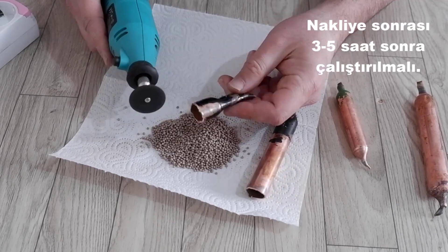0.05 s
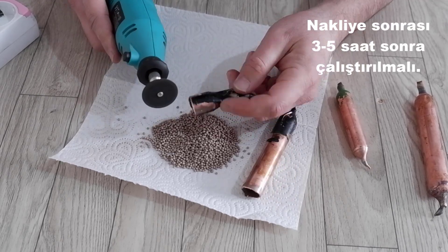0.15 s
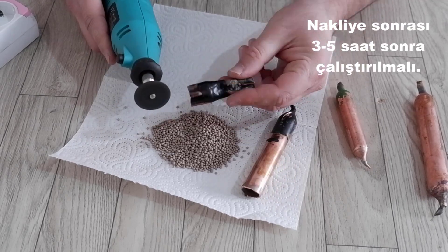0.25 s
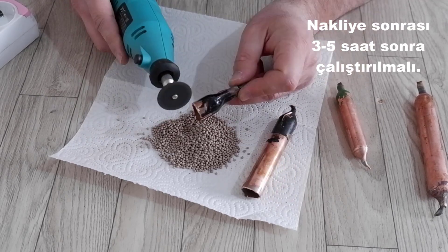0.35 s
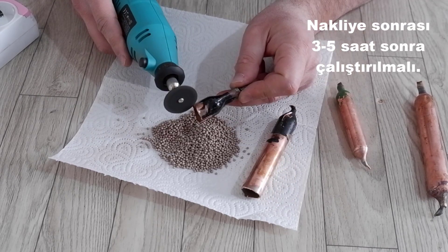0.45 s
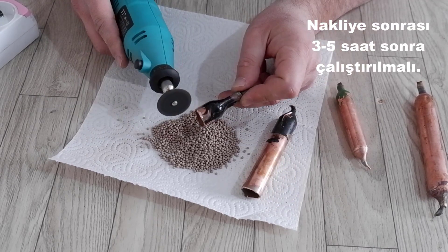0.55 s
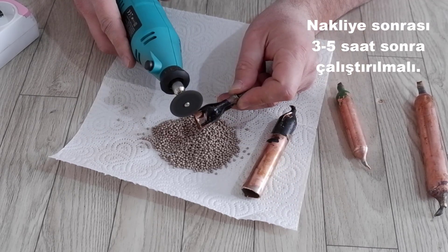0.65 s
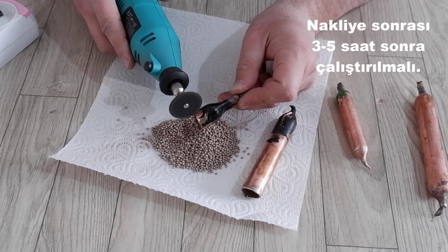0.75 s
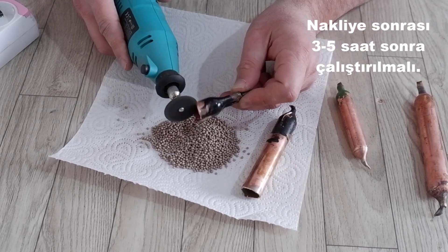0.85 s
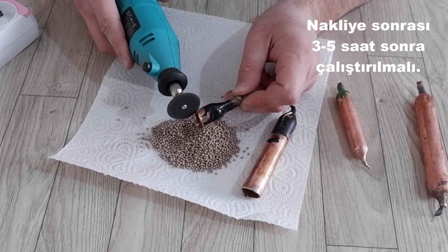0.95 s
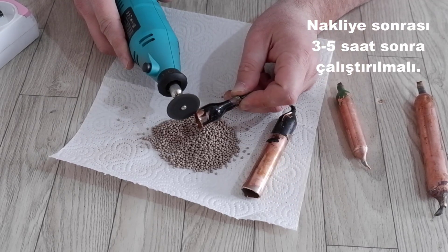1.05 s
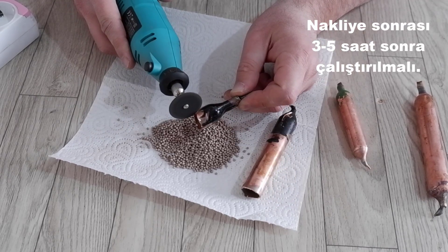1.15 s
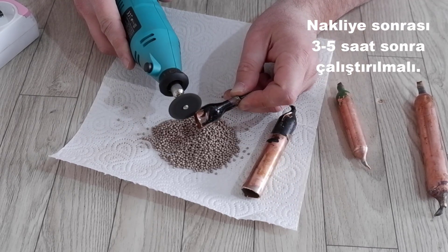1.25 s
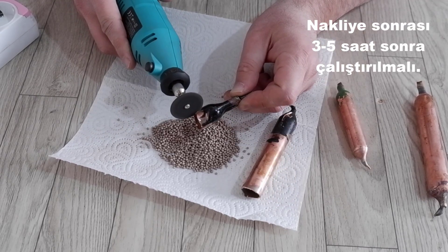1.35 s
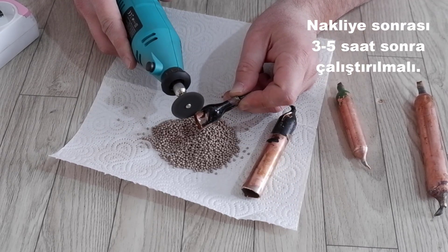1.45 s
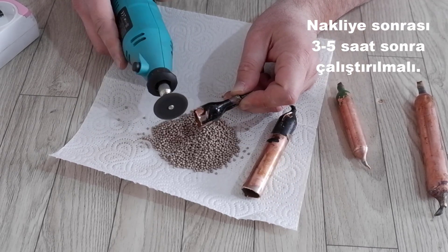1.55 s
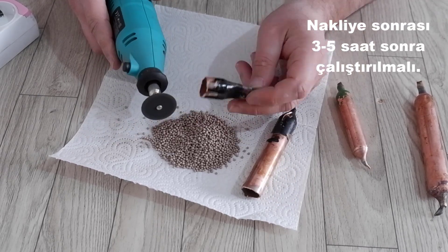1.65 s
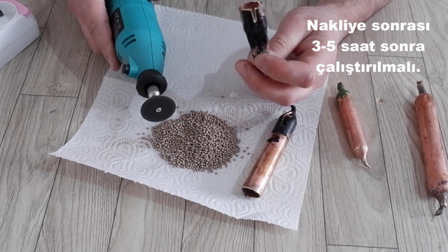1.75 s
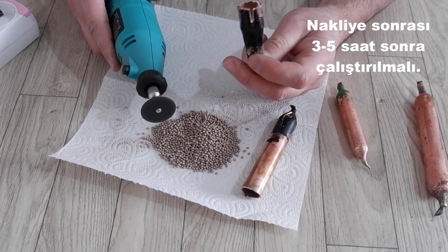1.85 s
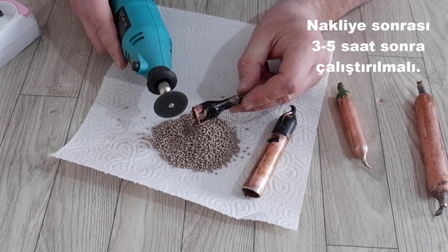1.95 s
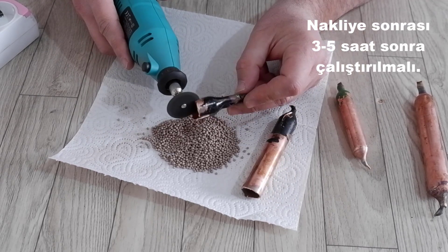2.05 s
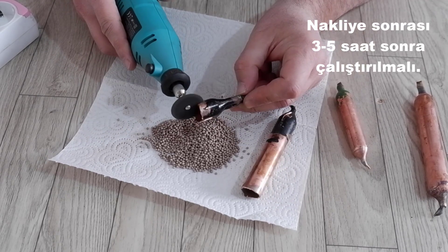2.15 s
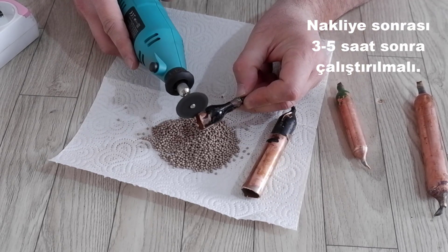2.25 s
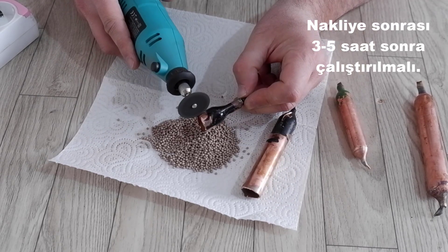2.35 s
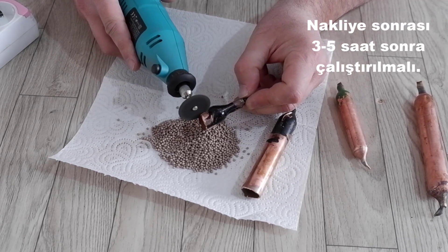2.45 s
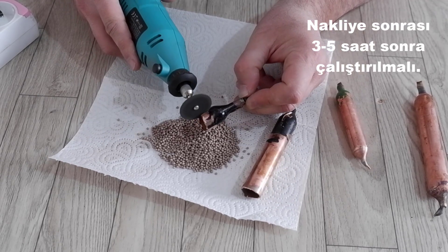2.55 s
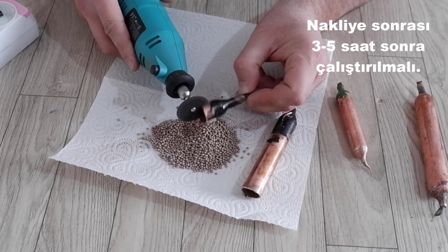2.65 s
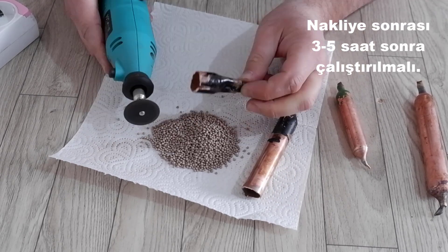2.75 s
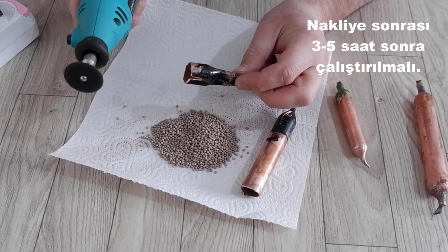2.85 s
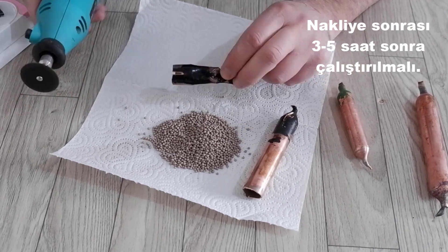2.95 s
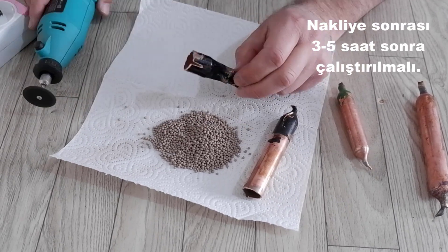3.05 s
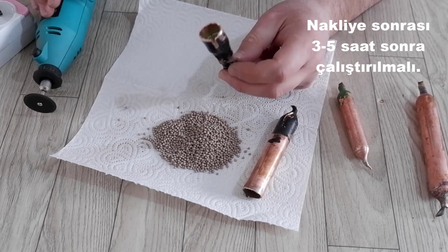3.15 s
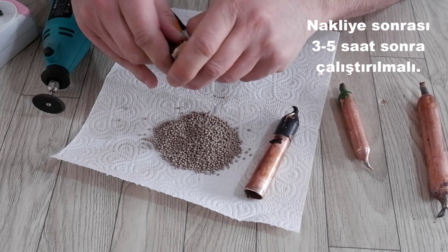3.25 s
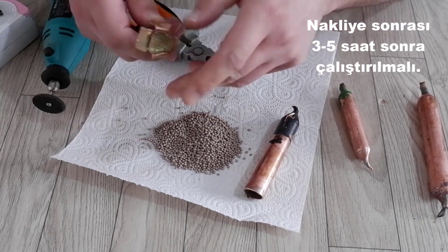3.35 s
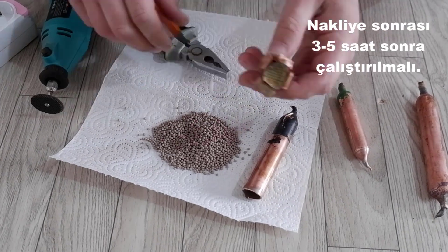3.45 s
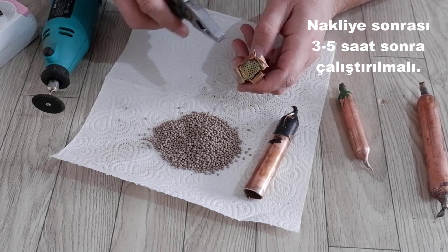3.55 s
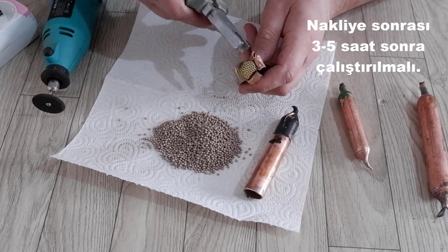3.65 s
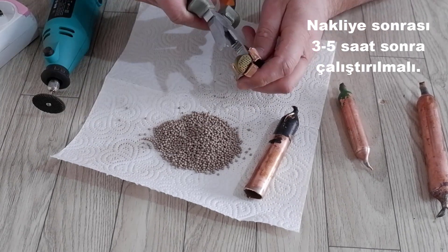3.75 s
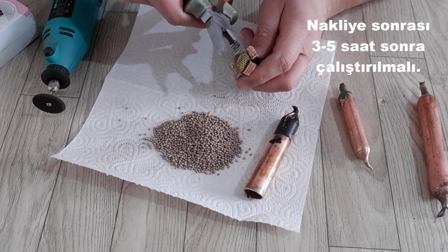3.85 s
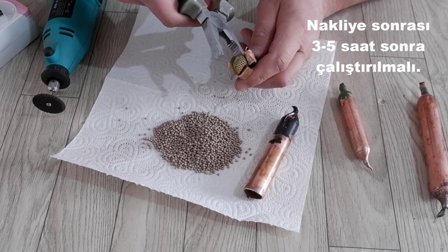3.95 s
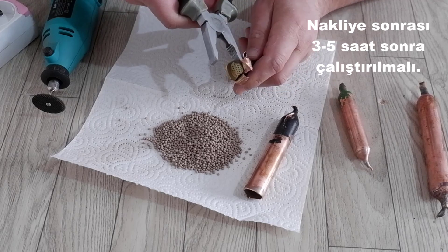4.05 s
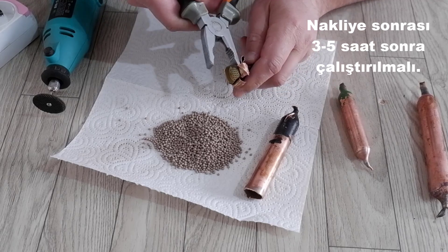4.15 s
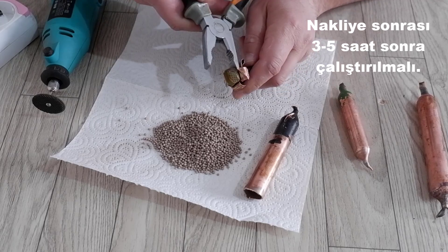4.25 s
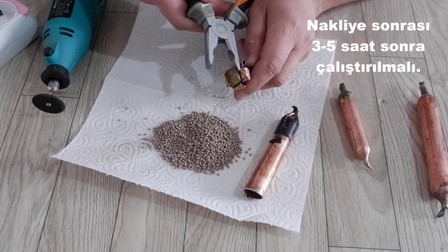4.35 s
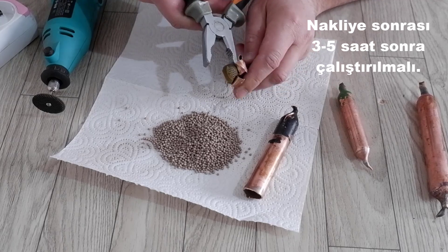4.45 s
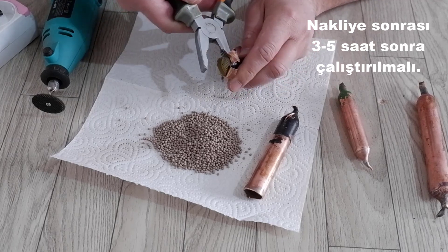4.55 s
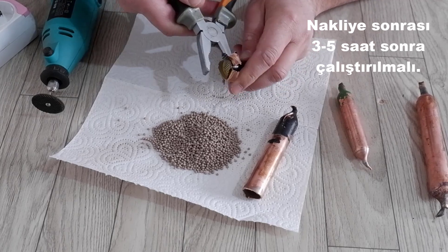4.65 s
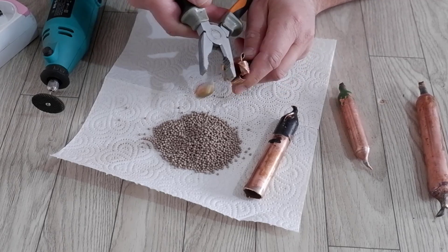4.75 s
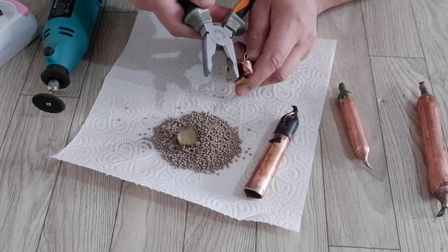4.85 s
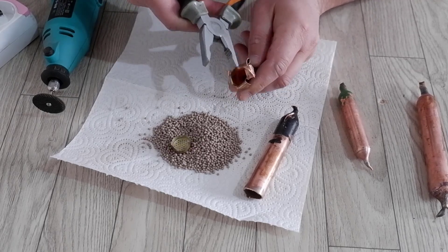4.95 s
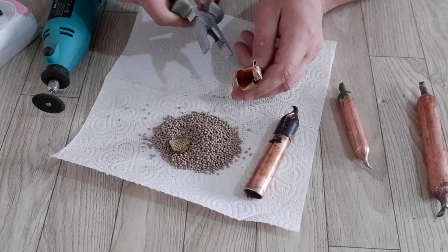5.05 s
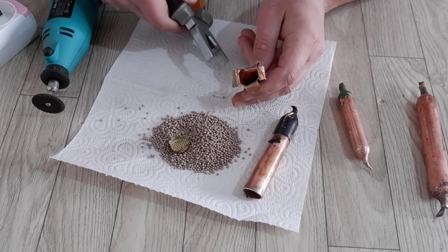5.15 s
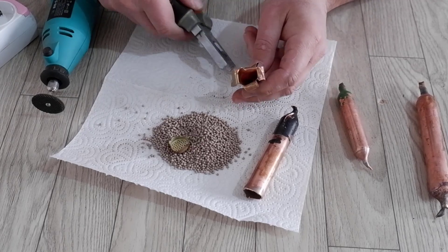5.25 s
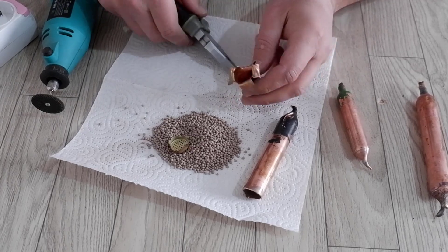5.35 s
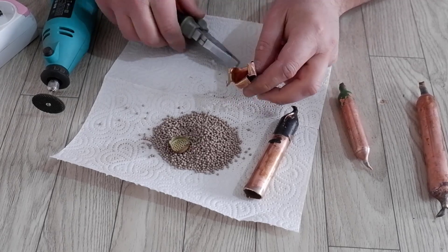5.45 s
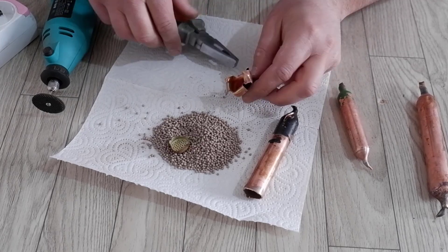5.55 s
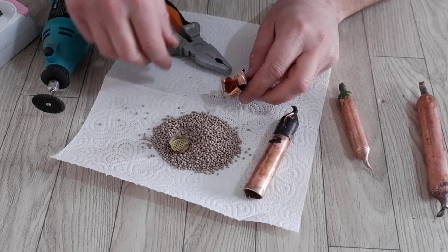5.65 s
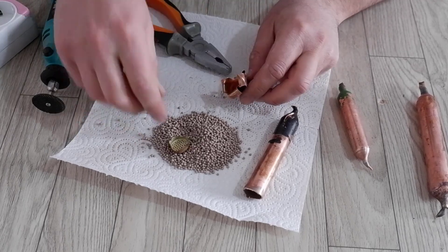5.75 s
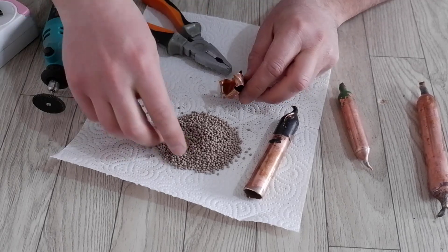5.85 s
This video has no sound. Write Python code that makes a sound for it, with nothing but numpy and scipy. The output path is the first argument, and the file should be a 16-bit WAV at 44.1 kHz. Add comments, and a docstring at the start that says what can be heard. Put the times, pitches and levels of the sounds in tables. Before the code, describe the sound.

High whirring cutter bites copper in rasping bursts, switches off, and light metallic clicks and dull thuds of tools on laminate follow in quiet.

```python
"""Rotary tool on a copper tube

A small mains rotary tool whines, sags in speed and screeches as its disc bites a copper tube, then is switched off.
The tool is shaft-locked tones plus filtered noise; its grit repeats each turn and drives bands of tube and disc.
Pliers tick on the tube (noise snaps and dying sines), a brass screen springs out and rings (fluttering modes),
and tools are set down on a laminate floor (damped swings and board modes).
A close pair of microphones hears it in a quiet, hard room, over a low hush and a faint rustle of hands."""
import sys
import numpy as np
from scipy import signal
from scipy.fft import rfft, irfft, next_fast_len
from scipy.io import wavfile
from scipy.ndimage import uniform_filter1d, map_coordinates

SR = 44100
rng = np.random.default_rng(int(sys.argv[2]) if len(sys.argv) > 2 else 0)


def to_wav(sig):
    """Store sig (one row per channel, or 1-D mono) as 16-bit WAV at the path in sys.argv[1].

    Samples outside -1..1 are clipped; the rate is SR.
    """
    pcm = np.clip(np.atleast_2d(sig), -1, 1) * 32767
    pcm = np.round(pcm).astype(np.int16)
    wavfile.write(sys.argv[1], SR, pcm.T)  # frames by channels


N = 260631
T = np.arange(N) / SR
OFF_S, WHIRR_OUT_S = 2.975, 3.275  # switched off; the whirr fades out quickly from here


def tool():
    """The turning shaft paces tones and grit; returns the part both microphones share and the diffuse part."""
    hz, hum_db, bars_db, air_db, roar_db, screech_db, rasp_db = controls()
    # the speed shivers, more so the further it sags
    sag = np.clip(1 - hz / 460, 0, 1)
    shiver = (.001 + .008 * sag) * wander(N, size=350)
    turn = 2 * np.pi * np.cumsum(hz * (1 + shiver)) / SR
    ripple = 2 * np.pi * 100 * T  # twice the mains frequency
    # the bite jars the rotor and roughens its tones
    biting = np.clip((rasp_db + 60) / 25, 0, 1)
    shudder = (.004 + .07 * biting) * wander(N, size=260)
    shudder += (.2 * biting + .5 * sag) * wander(N, size=1100)
    shaft = turn + shudder

    # rotor tones weaken with speed and fade after switch-off
    fade_db = 24 * sag + 0.99 * biting + np.clip(12 * (T - OFF_S), 0, 30)
    tones = amp(hum_db + 3.0) * np.cos(shaft)
    tones += amp(bars_db + 1.5) * commutator(shaft, ripple, sag)
    tones += amp(air_db - 4.5 - fade_db) * rotor_tones(hz, shaft)
    tones += bearing_growl(shaft, sag)
    tones += amp(rasp_db - 50.0) * np.cos(ripple)  # the field coils buzz under load

    fan = coloured(rng.standard_normal((3, N)), FAN) * (1 + 0.26 * np.cos(ripple))
    grit = rim_grit(turn)
    noise = amp(air_db + 2.0) * fan + amp(roar_db + 3.0) * vent_roar(fan)
    noise += amp(rasp_db - 3.0) * tube_rasp(grit) + amp(screech_db + 4.5) * disc_screech(grit)
    noise += housing_rattle(fan, sag)
    return tones + 0.47 * noise[0], 0.26 * noise[1:]


# The hand leans the disc on the tube.
# Each row: start in seconds, end in seconds, screech of the disc in relative dB, rasp of the tube in relative dB.
PRESSES = [(0.552, 0.608, -38, -27), (0.61, 0.648, -36, -32), (0.759, 0.844, -35, -25),
           (0.836, 0.954, -30, -20.5), (0.959, 1.053, -35.5, -30.5), (1.055, 1.081, -38.5, -28),
           (1.091, 1.188, -33, -27.5), (1.177, 1.258, -33, -26.5), (1.268, 1.357, -32, -25),
           (1.359, 1.441, -30, -26), (1.436, 1.658, -30, -22), (2.146, 2.165, -33.5, -25),
           (2.171, 2.247, -37, -34.5), (2.255, 2.285, -27, -22), (2.288, 2.341, -38.5, -30),
           (2.342, 2.375, -31, -22.5), (2.38, 2.41, -25.5, -22.5), (2.477, 2.521, -29.5, -22.5),
           (2.523, 2.544, -40, -31.5), (2.544, 2.592, -28, -24), (2.599, 2.648, -36, -29.5),
           (2.649, 2.698, -32.5, -25.5), (2.704, 2.792, -30, -22.5)]
# Shaft speed and hum level through time: the speed sags under load and falls after switch-off.
# Each row: time in seconds, shaft speed in Hz, hum rms in dB.
SHAFT = [(0.0, 353, -67), (0.02, 366.6, -50.5), (0.09, 414, -65), (0.15, 426.5, -50.5),
         (0.24, 441.6, -50.5), (0.3, 450.6, -72), (0.35, 456, -52.5), (0.54, 456.4, -50.5),
         (0.55, 457, -57.5), (0.6, 426, -43), (0.64, 392.4, -80), (0.67, 404.5, -50.5), (0.73, 425, -48.5),
         (0.76, 429.4, -45), (0.82, 400.6, -60.5), (0.86, 372.3, -43), (0.96, 292.5, -71),
         (0.99, 290.3, -57.5), (1.04, 312, -76.5), (1.06, 316.2, -57.5), (1.09, 326.3, -63.5),
         (1.16, 297.7, -85), (1.17, 296.2, -56.5), (1.23, 270.9, -63), (1.31, 245.5, -54.5),
         (1.37, 233.1, -60.5), (1.5, 221.1, -54.5), (1.59, 227.5, -59.5), (1.63, 221.8, -57),
         (1.72, 339.6, -66.5), (1.74, 356.4, -59), (1.78, 380.3, -48.5), (1.81, 398, -84),
         (1.85, 411.3, -58), (1.95, 437.5, -46), (2.01, 445.8, -50), (2.14, 448.2, -55.5),
         (2.18, 427.7, -47), (2.22, 433.3, -41.5), (2.25, 414, -54.5), (2.27, 393.3, -75), (2.29, 401, -53),
         (2.33, 406.5, -55), (2.39, 377.4, -58.5), (2.45, 371.4, -48.5), (2.49, 379.8, -40),
         (2.51, 372.3, -49), (2.59, 320.2, -62.5), (2.7, 356, -46), (2.75, 348.2, -48.5),
         (2.82, 356.8, -56.5), (2.85, 373.5, -50.5), (2.93, 410.5, -64.5), (2.98, 424.2, -54),
         (3.02, 364.4, -57), (3.1, 270, -75), (3.15, 202.8, -55), (3.18, 179, -47), (3.21, 151, -66),
         (3.27, 111.3, -75.5)]
# Commutator whine through the casing. Each row: frequency in Hz, relative level in dB.
CASING_WHINE = [(1500, -69), (1850, -70.5), (2250, -53.5), (2580, -40.5), (2950, -45.5), (3400, -45.5),
                (3650, -40)]
# Air noise of the coasting rotor. Each row: shaft speed in Hz, change of level in dB.
RUN_DOWN = [(90, -61), (125, -19), (230, -7.5), (300, -4.5), (420, -1.5)]
FREE_HZ = 456  # shaft speed without load
BITE_S, LEAD_S = 0.0089, 0.013  # the disc takes hold; its sound comes a little before the rotor feels the load
JUDDER_DB = 0.88  # rms waver of the grip
WHINE_WAVER_DB, WHINE_OFF_DB_PER_S = 1, -150
AIR_DB, AIR_LOAD_DB = -40, -6  # relative hiss of cooling air running free; its change at stall
ROAR_DB, ROAR_LOAD_DB, ROAR_BITE_DB = -43.5, -90.5, -4.5  # relative roar of the vents; change at stall, in contact


def controls():
    """Speed and contact set the level of the main parts of the tool."""
    screech, rasp, touch = np.zeros((3, N))
    for start, end, press_screech_db, press_rasp_db in PRESSES:
        on = slice(round(start * SR), round(end * SR))
        screech[on], rasp[on], touch[on] = amp(press_screech_db), amp(press_rasp_db), 1

    def ease(x):
        """The disc takes hold gradually: a running mean."""
        return uniform_filter1d(x, round(BITE_S * SR))

    hz, hum_db = curves(SHAFT)
    hz = uniform_filter1d(hz, size=900)
    load = np.clip(1 - hz / FREE_HZ, 0, 1) * (T < OFF_S)
    whirr_out_db = -900 * np.maximum(T - WHIRR_OUT_S, 0)
    bars_db = read(CASING_WHINE, 8 * hz) + WHINE_OFF_DB_PER_S * np.maximum(T - OFF_S, 0)
    bars_db += WHINE_WAVER_DB * wander(N, size=1000)
    fall_db = read(RUN_DOWN, hz) * (T > OFF_S) + whirr_out_db
    air_db = AIR_DB + ease(AIR_LOAD_DB * load) + fall_db
    roar_db = ROAR_DB + ease(ROAR_LOAD_DB * load ** 2 + ROAR_BITE_DB * touch) + fall_db
    judder_db, early = JUDDER_DB * wander(N, size=1500), round(LEAD_S * SR)

    def contact_db(x):
        """Eased contact level, brought forward and juddering."""
        return 20 * np.log10(abs(ease(np.roll(x, -early))) + 1e-6) + judder_db

    return hz, hum_db + whirr_out_db, bars_db, air_db, roar_db, contact_db(screech), contact_db(rasp)


# Commutator tone and its side tones.
# Each row: offset in steps of twice the mains, relative level in dB, gain at stall in dB.
RIPPLE = [(0, 0, -4), (-1, -13, 22), (-2, -18, 24), (1, -18, 22)]


def commutator(shaft, ripple, sag):
    """Eight bars a turn whine; as speed sags the current ripple deepens, side tones grow and the tone breaks up."""
    bars = 0
    for step, db, deepen_db in RIPPLE:
        level_db = db + sag * (deepen_db + 10 * wander(N, size=900))
        break_up = 5 * sag * wander(N, size=500)
        bars = bars + amp(level_db) * np.cos(8 * shaft + step * ripple + break_up)
    return bars


# Fan and rotor tones. Each row: multiple of the shaft speed, relative level in dB.
WHINE = [(2, -13), (3, -16), (4, -25.5), (5, -13.5), (9, -7), (10, -3.5), (11, -12.5), (12, -16), (13, -14),
         (14, -5), (15, -4.5), (16, 4), (17, -7.5), (18, 3.5), (24, -11.5), (30, -19), (31, -20),
         (32, -8.5)]
# How the housing passes them. Each row: frequency in Hz, gain in dB.
SHELL = [(800, 4), (3000, -3), (4200, 2.5), (5200, -0.5), (6300, 3), (7200, -1), (7800, -1), (8400, -15.5),
         (12000, 2.5), (15500, -4)]


def rotor_tones(hz, shaft):
    """Multiples of the shaft speed, each wavering and weighted by the housing as it glides."""
    tones = 0
    for k, db in WHINE:
        level_db = db + read(SHELL, k * hz) + 2.2 * wander(N, size=1500)
        tones = tones + amp(level_db) * np.cos(k * shaft + 2 * np.pi * rng.random())
    return tones


# The loaded shaft shakes its bearings. Each row: multiple of the shaft speed, relative level in dB.
GROWL = [(2, -68), (3, -66), (4, -66), (5, -66)]


def bearing_growl(shaft, sag):
    """Low multiples of the shaft speed come up as the speed sags."""
    growl = sum(amp(db + 1.5 + 4 * wander(N, size=3500)) * np.cos(k * shaft) for k, db in GROWL)
    return np.clip(3 * sag, 0, 1) * (T < 3.05) * growl


RIM_TURNS, RIM_SHARE = 9, 0.68  # turns until the grit wears into a new pattern; the pattern's share of the bite


def rim_grit(turn):
    """The same grains come round each turn, so the noise of the bite holds rough tones of the shaft speed."""
    turns = turn / (2 * np.pi)
    phase = turns % 1
    pattern = rng.standard_normal((3, 400, 192))
    wear = turns / RIM_TURNS
    rim = np.array([map_coordinates(p, [wear, phase * 191], order=1) for p in pattern])
    rim = rim / np.hypot(wear % 1, 1 - wear % 1)  # blending two patterns keeps the level
    grit = RIM_SHARE * evened(rim) + (1 - RIM_SHARE) * rng.standard_normal((3, N))
    # the disc runs slightly out of true: its high spot strikes once a turn and the grit bites hardest there
    grit = grit * (1.0 + np.exp(-phase / 0.1)) * amp(1.6 * wander(N, size=300))
    blows = evened(np.diff(np.floor(turns), prepend=0)) * amp(2.5 * wander(N, size=300))
    return evened(grit) + 0.4 * np.array([blows, np.roll(blows, 37), -np.roll(blows, 61)])


# Spectrum of the rasp. Each row: frequency in Hz, relative level in dB.
RASP = [(150, -43.5), (1200, -46), (1900, -23), (2600, -3.5), (3500, 10), (5000, -2.5), (6500, -2),
        (8000, 0), (9500, -6), (12000, -41)]
# Bands in which the tube sings. Each row: frequency in Hz, width in Hz, relative level in dB.
TUBE = [(2360, 53, 2), (2490, 457, 6.5), (2900, 330, -1.5), (4310, 420, -2), (5040, 890, 3),
        (6550, 400, -10), (6440, 1280, 2.5), (9100, 6000, -3.5)]


def tube_rasp(grit):
    """Grit scrapes the copper, broad rasp plus the wavering bands of the tube."""
    rasp = coloured(grit, RASP)
    for hz, width, db in TUBE:
        sing = resonate(resonate(grit, hz, width), hz, 3 * width)
        rasp = rasp + amp(db + 5.5 + 2.5 * wander(N, size=1400)) * sing
    return evened(rasp)


# Bands in which the disc screeches. Each row: frequency in Hz, width in Hz, relative level in dB.
DISC = [(11730, 720, -7), (14320, 3650, 7.5), (15300, 1100, -3), (16600, 7500, 2)]


def disc_screech(grit):
    """Grit excites the high bands of the disc, each wavering."""
    screech = 0
    for hz, width, db in DISC:
        band = resonate(resonate(grit, hz, width), hz, width)
        screech = screech + amp(db + 3.8 * wander(N, size=500)) * band
    return evened(screech)


# Spectrum of the cooling air. Each row: frequency in Hz, relative level in dB.
FAN = [(60, -60.5), (100, -30.5), (400, -18), (900, -16), (1800, -10.5), (2600, -16.5), (4000, -6.5),
       (5400, -8), (7300, -3.5), (8400, -12.5), (15500, -14.5)]
# Resonances of the vents. Each row: frequency in Hz, width in Hz, relative level in dB.
VENTS = [(870, 180, 3), (1455, 290, 0.5), (2280, 410, 1.5)]


def vent_roar(fan):
    """Fan noise resonates in the vents."""
    return evened(sum(amp(db) * resonate(fan, hz, width) for hz, width, db in VENTS))


# The laboring rotor rattles the housing. The one row: frequency in Hz, width in Hz, relative level in dB.
SHELL_RING = (2558, 110, -50.5)


def housing_rattle(fan, sag):
    """A narrow, wavering band of fan noise, at full level once the speed has sagged by about a seventh."""
    hz, width, db = SHELL_RING
    band = evened(resonate(resonate(fan, hz, width), hz, 3 * width))
    waver = amp(3.5 * wander(N, size=900))
    return amp(db) * waver * np.clip(6.6 * sag, 0, 1) * (T < OFF_S) * band


# The microphone pair toward the tool.
# Each row: frequency in Hz, lead of the left in radians, left over right in dB.
PAIR = [(100.5, 0.33, 12.5), (413, 1.4, 11), (780, 1.4, 6), (2970, 0.56, 9), (6440, 1.66, -2),
        (8810, 1.78, -4), (14800, 2.3, -2.5)]


def pair(x):
    """The same wave reaches the two microphones with a lead and a balance that change with frequency."""
    size = next_fast_len(N)
    lead, over_db = read(PAIR, np.fft.rfftfreq(size, 1 / SR))
    half = amp(over_db / 2) * np.exp(.5j * lead)
    return irfft(rfft(x, size) * np.array([half, 1 / half]), size)[:, :N]


def handling():
    """Ticks of pliers, rings of the screen and thuds on the boards."""
    mix, t = np.zeros((2, N)), np.arange(12000) / SR
    plier_ticks(mix, t)
    screen_rings(mix, t)
    floor_thuds(mix, t)
    return mix


# Pliers on the tube. Each row: start in seconds, ring in dB, pitch in Hz, click in relative dB,
# click dulled above in Hz, left over right in dB.
TICKS = [(3.491, -66.5, 1150, -72, 4080, 17), (3.7392, -66, 1286, -60, 7990, -6),
         (3.804, -61, 1280, -58, 8000, -5), (3.869, -58, 1260, -47.5, 8000, -2),
         (3.913, -57, 1540, -55, 5900, 1), (4.6217, -59, 1790, -55, 8030, 0),
         (4.689, -59, 4200, -67, 8000, 8), (4.7069, -50, 1950, -44.5, 8000, -2),
         (5.049, -47, 4100, -74, 6050, 0), (5.1305, -51, 3910, -49.5, 8900, -3),
         (5.2017, -59, 2110, -56, 7000, -3), (5.515, -50, 5230, -46, 15000, -5),
         (5.658, -68, 5500, -61, 8000, -1), (5.794, -46, 6700, -58, 13100, 2),
         (5.814, -57, 6600, -46, 16000, -3), (5.843, -51, 4680, -48.5, 15000, -1)]


def plier_ticks(mix, t):
    """A noise snap, one short dying sine and a few grains."""
    for s, db, hz, click_db, top_hz, pan_db in TICKS:
        tick = amp(click_db) * snap(t, 0.0013, top_hz) + ring([(hz, db, .025)], t)
        add(mix, s, tick + amp(click_db - 10.5) * scatter(t, 0.12), pan_db)


# The screen springs out. Each row: start in seconds, relative level in dB, gain of the two middle modes in dB,
# gain of the top mode in dB, scatter of grains in relative dB, left over right in dB.
RINGS = [(4.8415, -36, -13, -10, -40, -1.5), (4.846, -32.5, 5, -16, -54, -9),
         (4.856, -31.5, -4, -17, -61, 8), (4.866, -41.5, 9, -12, -70, -8), (4.97, -42, 12, 10, -79, -6)]
# Modes of the brass screen. Each row: frequency in Hz, relative level in dB, t60 in seconds.
SCREEN = [(1240, -16, .05), (2520, -9, .08), (4050, -7, .06), (5580, -13, .33), (6515, -17, .16),
          (7350, -16, .06), (12340, -2, .24), (14180, -9, .26)]


def screen_rings(mix, t):
    """A snap sets off dying modes; the screen tumbles as it rings, so each mode flutters."""
    for s, db, middle_db, top_db, grains_db, pan_db in RINGS:
        chime = 0
        for mode, gain_db in zip(SCREEN, [0, 0, 0, middle_db, middle_db, 0, 0, top_db]):
            chime = chime + ring([mode], t) * amp(gain_db + 2.4 * wander(len(t), size=500))
        strike = amp(db) * (.5 * snap(t, 0.0013, 24000) + 0.3 * chime)
        add(mix, s, strike + amp(grains_db) * scatter(t, 0.2), pan_db)


# Tools set down on the floor. Each row: start in seconds, relative level in dB, pitch in Hz, knock in relative dB,
# bright click in relative dB, scatter of grains in relative dB, lean of the push to the left in relative dB.
THUDS = [(4.968, -48.5, 300, -28.5, -58, -74, -29.5), (5.291, -20.5, 401, -25, -53, -57.5, 3.5),
         (5.46, -41, 190, -64, -82, -62.5, -6), (5.5, -30.5, 222, -30.5, -21.5, -39, -5),
         (5.642, -31, 245, -72, -80, -69, 3.5), (5.763, -14.5, 246, -30, -44, -46.5, -4),
         (5.769, -36, 282, -24.5, -26.5, -69, -11), (5.822, -25, 264, -53, -60, -67, 0.5),
         (5.886, -32, 414, -33.5, -80, -77, 2)]
# Modes of the boards. Each row: frequency in Hz, relative level in dB, t60 in seconds.
BOARD = [(143, 7, 0.071), (236, 19, 0.027), (347, 9, 0.042), (426, 6, 0.094), (624, 0, 0.05),
         (760, -8, 0.04)]
# broad after-shake of the floor: relative level, decay, upper edge as a multiple of the pitch of the blow
RUMBLE_DB, RUMBLE_T60_S, RUMBLE_TOP = -10.5, 0.2, 1.04


def floor_thuds(mix, t):
    """Each blow swings the board once, shakes its modes and leaves a rumble, under a knock, click and grains."""
    for s, db, hz, knock_db, click_db, grains_db, pan_db in THUDS:
        # the far microphone gets the heavily damped swing later and inverted
        push = np.sin(2 * np.pi * hz * t) * hz * t * np.exp(-2.2 * hz * t) * 6
        push = np.array([push, -np.roll(push, 20)])
        # the blow travels on through the boards and shakes their modes unevenly
        jolt = rng.standard_normal((2, 900)) * np.hanning(900) / 18
        shake = signal.oaconvolve(jolt, ring(BOARD, t)[None], axes=1)[:, :len(t)]
        band = signal.butter(2, [70, RUMBLE_TOP * hz], "band", fs=SR)
        rumble = evened(signal.lfilter(*band, rng.standard_normal((2, len(t)))))
        rumble = rumble * np.minimum(t / 0.0029, 1) * amp(db + RUMBLE_DB - 60 * t / RUMBLE_T60_S)
        contact = amp(knock_db + 11.5) * snap(t, 0.0025, 1160) + amp(click_db + 5.5) * snap(t, 0.00024, 8600)
        add(mix, s, rumble, 1.5)
        add(mix, s, amp(db + 8.0) * push, pan_db + 5.5)
        add(mix, s, amp(db - 21) * shake + contact + amp(grains_db) * scatter(t, 0.25), 1.0)


def snap(t, seconds, top_hz):
    """A short burst of noise, dulled above top_hz (at most 18 kHz), leaking a little between sides."""
    burst = rng.standard_normal((2, 1500)) * np.exp(-t[:1500] / seconds) + 1e-9
    dulled = signal.lfilter(*signal.butter(2, min(top_hz, 18000), fs=SR), burst + 0.11 * burst[::-1])
    return np.pad(dulled, ((0, 0), (0, len(t) - 1500)))


# Spectrum of the grains. Each row: frequency in Hz, relative level in dB.
GRAINS = [(400, -53), (800, -12), (1300, -0.5), (1900, -7), (5700, 2), (8500, -11.5), (13000, -18.5),
          (16000, -12)]


def scatter(t, t60):
    """Loose grains jump and settle."""
    hops = rng.standard_normal((2, len(t))) * (.5 + amp(4.5 * wander(len(t), size=60)))
    return coloured(hops, GRAINS) * amp(-60 * t / t60) * (1 - np.exp(-t / 0.0001))


# How fast the room dies. Each row: frequency in Hz, t60 in seconds at a decay scale of 1.
ROOM = [(100, .6), (500, .5), (2000, .45), (8000, .3), (15000, .2)]


def room(x, decay_scale):
    """Sparse taps of random sign, one in every 20 samples, each band dying at its own speed."""
    taps = np.zeros((2, SR // 2))
    at = np.arange(200, SR // 2 - 20, 20) + rng.integers(0, 20, (2, (SR // 2 - 201) // 20))
    np.put_along_axis(taps, at, rng.choice([-1., 1.], at.shape), 1)
    hz, t, z = signal.stft(taps, SR, nperseg=256)
    decay = amp(-60 * t / decay_scale / read(ROOM, hz)[:, None])
    tail = signal.istft(z * decay, SR, nperseg=256)[1]
    return signal.fftconvolve(x, tail / np.linalg.norm(tail[0]), axes=1)[:, :N]


# The quiet bed. Each row: time in seconds, room hush in relative dB, rustle of hands in relative dB.
STILL = [(0, -75, -100), (3.1, -73, -73), (3.3, -73.5, -76), (3.68, -76.5, -74), (3.8, -66.5, -65.5),
         (5.91, -69, -63)]
# Hands move. Each row: middle in seconds, length in seconds, gain of the hush in dB, gain of the rustle in dB.
STIRS = [(3.904, .12, 2, 1), (4.705, 0.23, 7, 5), (4.886, 0.16, 9, -4), (5.032, 0.15, 1, 7),
         (5.43, 0.17, 1, 5.5), (5.53, 0.23, 23, 0), (5.82, 0.46, 22, -2)]
# Spectrum of the hush. Each row: frequency in Hz, relative level in dB.
HUSH = [(15, 4), (40, -3), (100, -9.5), (250, -16), (600, -37.5), (1500, -73.5)]
# Spectrum of the rustle. Each row: frequency in Hz, relative level in dB.
RUSTLE = [(120, -28), (200, -6.5), (590, -12.5), (1100, -14.5), (1300, -16.5), (1450, -16.5), (8120, -27),
          (14900, -32.5), (16000, -32.5)]


def background():
    """Low hush and faint rustle, unrelated at the two microphones, follow level curves with brief rises and dips."""
    hush_db, rustle_db = curves(STILL)
    for s, length, hush_gain_db, rustle_gain_db in STIRS:
        stir = np.clip(1 - abs(T - s) / length * 2, 0, 1)
        hush_db = hush_db + hush_gain_db * stir
        rustle_db = rustle_db + rustle_gain_db * stir
    hush = coloured(rng.standard_normal((2, N)), HUSH) * amp(hush_db + 7.5 + 1.3 * wander(N, size=4000))
    return hush + coloured(rng.standard_normal((2, N)), RUSTLE) * amp(rustle_db - 3.0)


def amp(db):
    """Decibels to gain."""
    return 10 ** (np.asarray(db) / 20)


def evened(x):
    """Scales to unit rms."""
    return x / np.sqrt(np.mean(x ** 2) + 1e-20)


def read(points, hz):
    """Columns of a spectrum table on a log frequency axis."""
    f, *columns = np.transpose(points)
    return np.squeeze([np.interp(np.log(hz + 1), np.log(f + 1), c) for c in columns])


def curves(rows):
    """Columns of a time table, sample by sample."""
    s, *columns = np.transpose(rows)
    return [np.interp(T, s, c) for c in columns]


def coloured(x, points):
    """Imposes a spectrum, unit rms."""
    size = next_fast_len(x.shape[-1])
    gain = amp(read(points, np.fft.rfftfreq(size, 1 / SR)))
    return evened(irfft(rfft(x, size) * gain, size)[..., :x.shape[-1]])


def resonate(x, hz, width):
    """Two-pole band of gain 1."""
    return signal.lfilter(*signal.iirpeak(hz, hz / width, SR), x)


def wander(count, size):
    """Smooth chance of unit rms that turns about every size samples."""
    knots = uniform_filter1d(rng.standard_normal(4 * count // size + 2), size=4)
    return evened(np.interp(np.arange(count) * 4 / size, np.arange(len(knots)), knots))


def ring(modes, t):
    """Dying sines."""
    return sum(amp(db - 60 * t / t60) * np.sin(2 * np.pi * hz * t) for hz, db, t60 in modes)


def add(mix, s, sound, pan_db):
    """Places a sound at s seconds, left over right by pan_db."""
    part = mix[:, round(s * SR):][:, :sound.shape[-1]]
    part += amp([[pan_db / 2], [-pan_db / 2]]) * np.atleast_2d(sound)[:, :part.shape[1]]


def scene():
    """Tool, handling, their echoes and the background."""
    shared, diffuse = tool()
    hands = handling()
    # the floor and hands right by the tool throw back its upper range
    upper = signal.lfilter(*signal.butter(2, 600, "high", fs=SR), shared)
    close_echoes = amp(-3) * room(upper[None], .3)
    hand_echoes = amp(-11.5) * room(hands, 0.5)
    return pair(shared) + diffuse + close_echoes + hands + hand_echoes + background()


def record(dry):
    """The band limit: a steep low-pass at 15.9 kHz."""
    low_pass = signal.firwin(511, 15900, window=("kaiser", 9), fs=SR)
    return signal.oaconvolve(dry, low_pass[None], "same")


dry = scene()
out = record(dry)
to_wav(out)
```